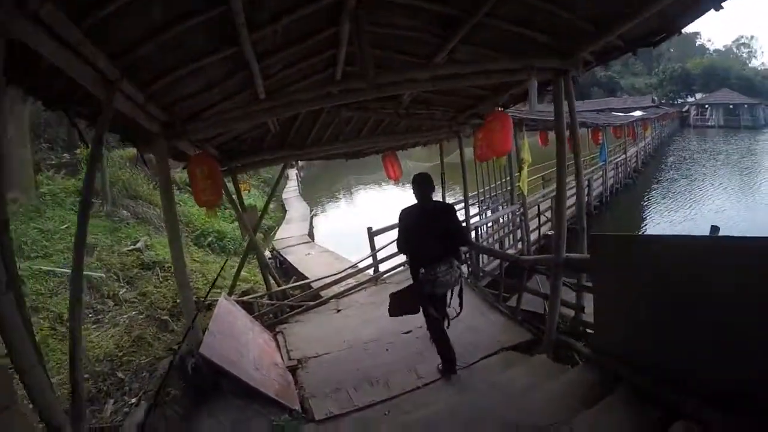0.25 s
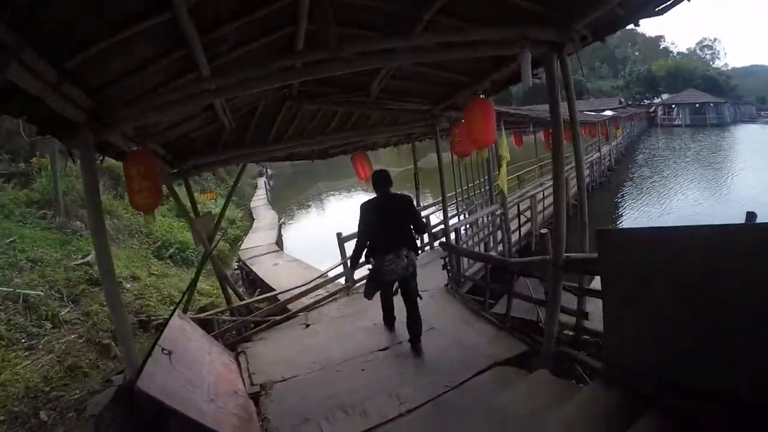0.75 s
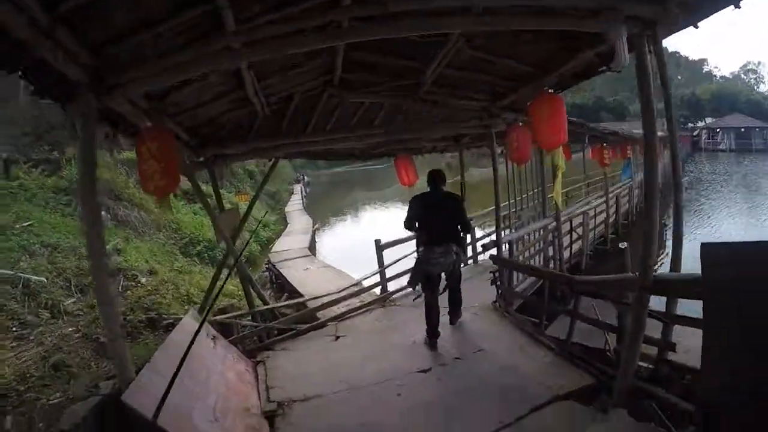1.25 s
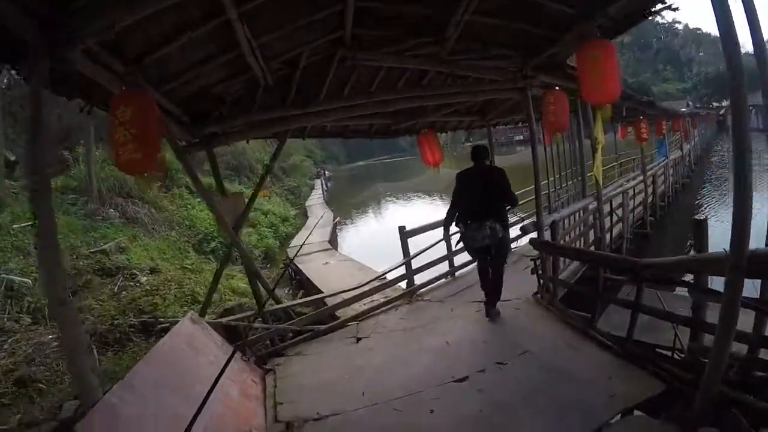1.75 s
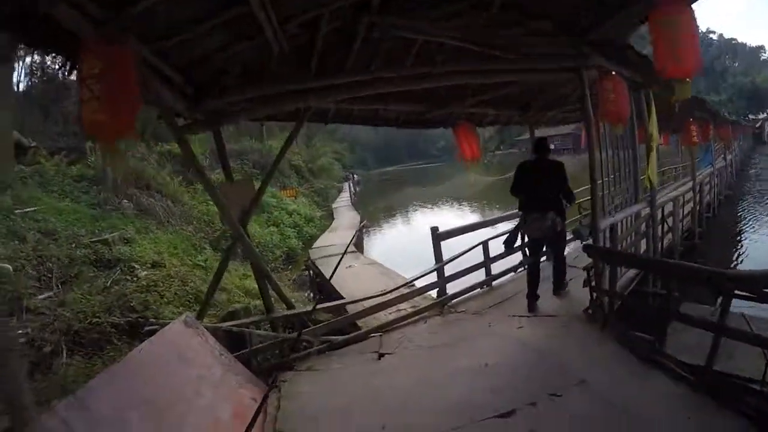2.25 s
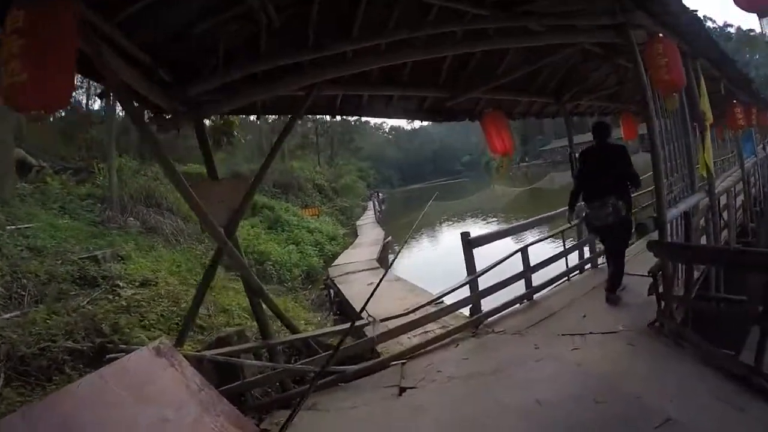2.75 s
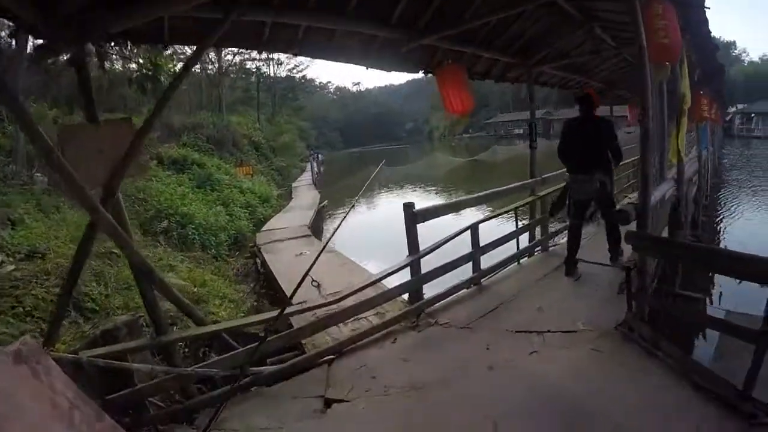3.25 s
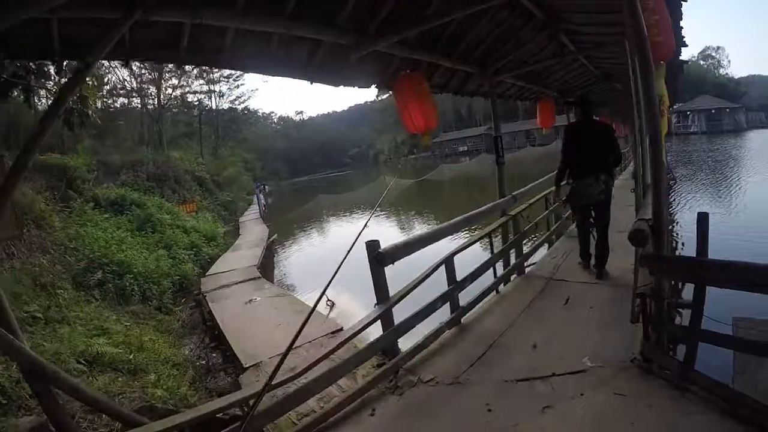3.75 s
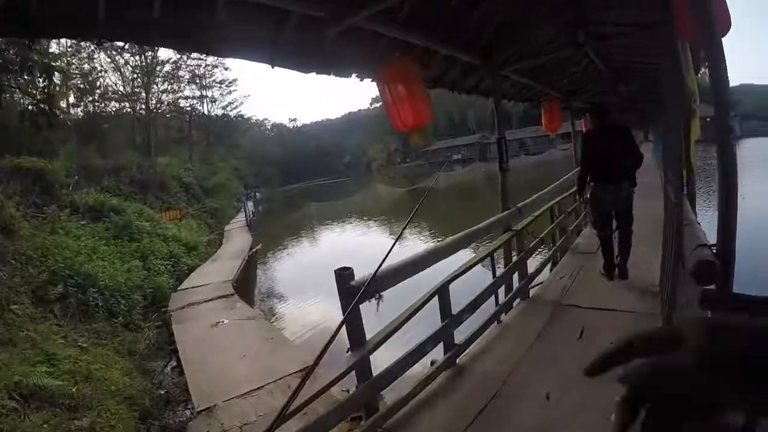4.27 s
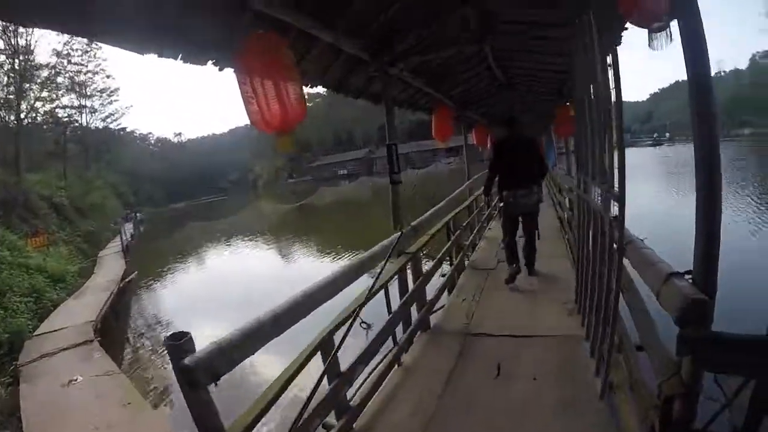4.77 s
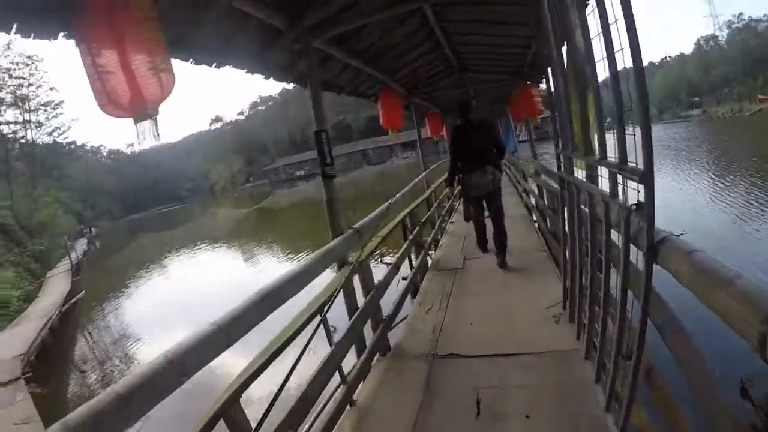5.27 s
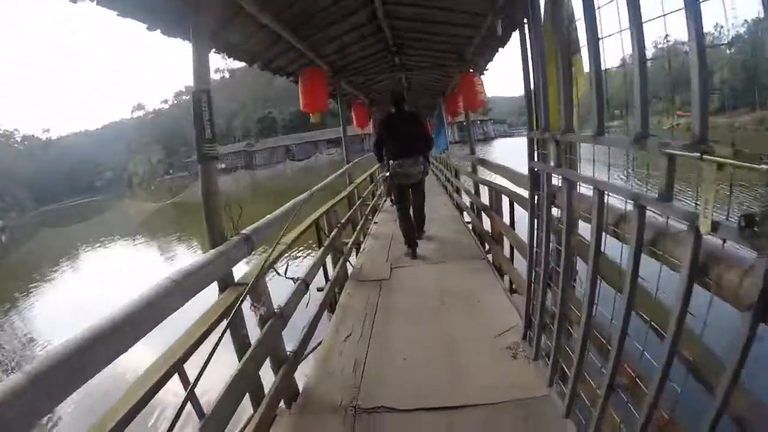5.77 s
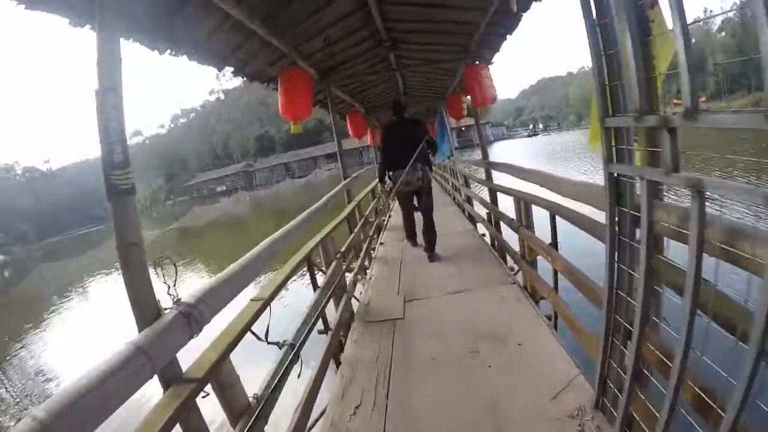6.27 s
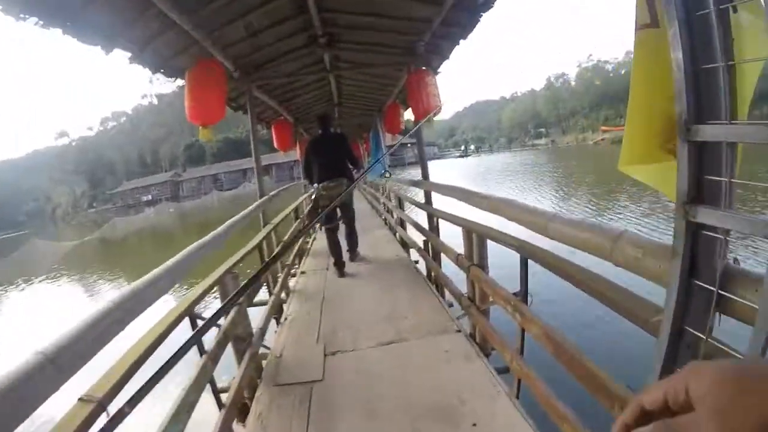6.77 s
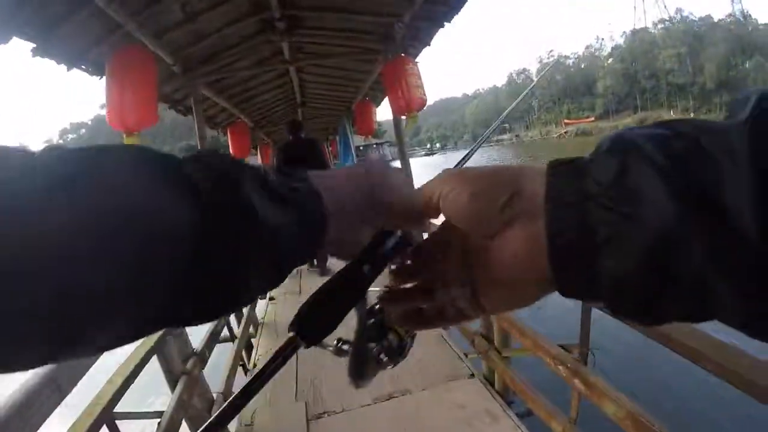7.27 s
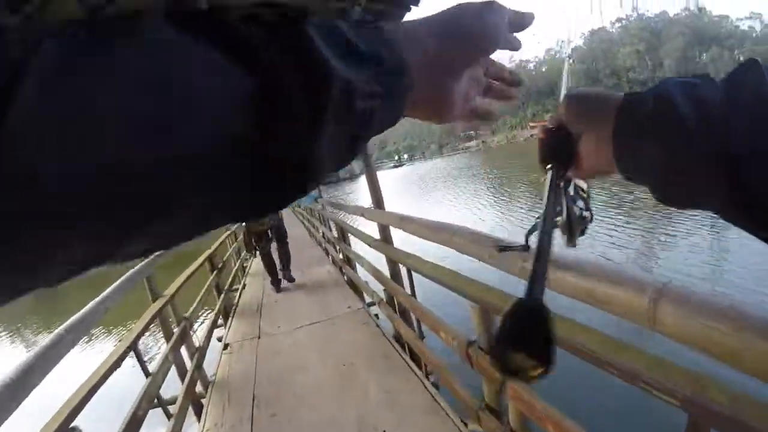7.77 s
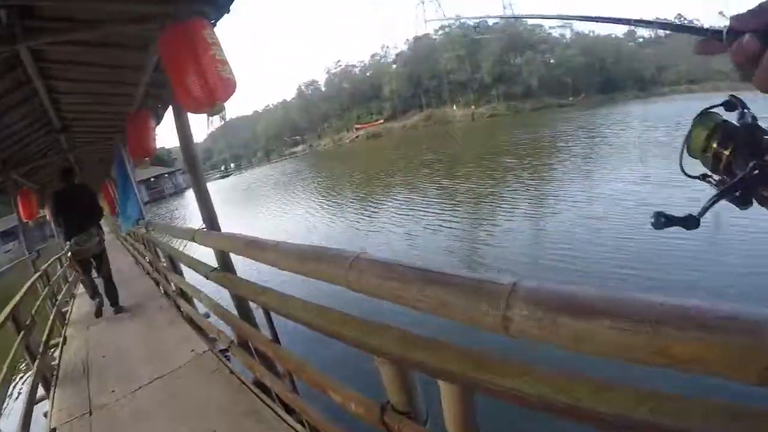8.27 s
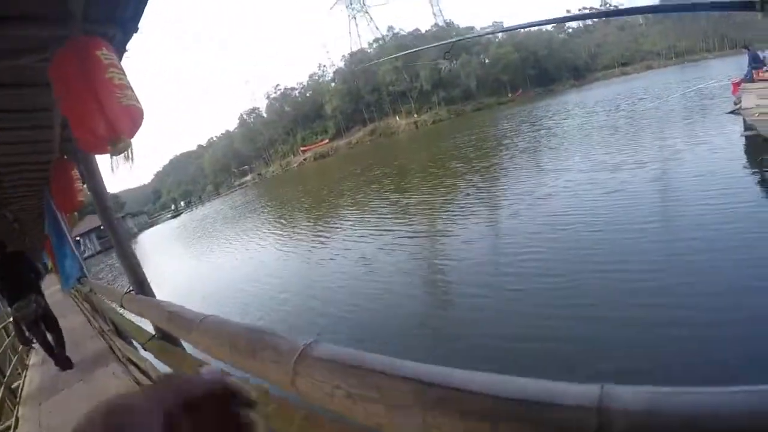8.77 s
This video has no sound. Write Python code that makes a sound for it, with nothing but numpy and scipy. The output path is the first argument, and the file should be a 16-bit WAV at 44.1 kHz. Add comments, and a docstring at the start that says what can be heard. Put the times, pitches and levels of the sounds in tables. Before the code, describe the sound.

Close, muffled body-worn microphone outdoors over water: low footstep jolts thud on hollow planks while a nylon jacket rustles and swishes and tackle ticks irregularly. Tiny metal tinkles and sleeve scrapes come and go. Steps soften after seven seconds; the reel squeaks faintly near eight, clicks open, then snaps shut hard at the end, with a faint distant bird. Soft air hiss throughout.

```python
"""A walker on a plank walkway, small camera strapped to the chest; air hiss and thin whine throughout.
From the start: jolts as damped swings, strap sway, cloth rustle and stirs, tackle ticks as slips and
bursts of noise through housing cavities; from 0.6 s loose metal tinkles as decaying sines. From 1.3 s
sleeve scrapes; at 3.3 s an insect buzz of throbbing noise bands; near 8 s reel squeaks of resonant noise,
then two reel snaps of decaying sines; from 8.6 s a far bird in short whistles."""
import sys
import numpy as np
from scipy import signal
from scipy.fft import rfft, irfft
from scipy.io import wavfile
from scipy.ndimage import uniform_filter1d

SR = 44100
rng = np.random.default_rng(int(sys.argv[2]) if len(sys.argv) > 2 else 0)


def master_out(mix):
    """Clip the mix to full scale and print it as 16-bit PCM to the path in sys.argv[1]."""
    frames = np.transpose(np.atleast_2d(mix))
    ceiling = np.clip(frames, -1, 1)
    pcm = np.round(ceiling * 32767).astype(np.int16)
    wavfile.write(sys.argv[1], SR, pcm)


N = 398223


def undb(db):
    """dB to gain."""
    return 10 ** (np.asarray(db) / 20)


def level(x, db):
    """Scale to an rms level."""
    return x * undb(db) / np.sqrt(np.mean(x ** 2))


def curve(table):
    """Each column as a straight-line curve over time."""
    s, *columns = np.transpose(table)
    return [np.interp(np.arange(N) / SR, s, c) for c in columns]


def band(x, lo_hz, hi_hz, order=2):
    """Band-pass."""
    sos = signal.butter(order, [lo_hz, min(hi_hz, .45 * SR)], "bandpass", fs=SR, output="sos")
    return signal.sosfilt(sos, x)


def ring(x, hz, width_hz):
    """One resonance."""
    return signal.lfilter(*signal.iirpeak(hz, hz / width_hz, fs=SR), x)


def add(out, s, sound):
    """Mix a sound in at time s."""
    i = int(s * SR)
    out[i:i + len(sound)] += sound[:N - i]


def walk(rate_hz):
    """Random levels held 1 / rate_hz and slewed twice; spread near 1."""
    k = int(SR / rate_hz)
    steps = np.repeat(rng.standard_normal(N // k + 1), k)
    return 4 / 3 * uniform_filter1d(uniform_filter1d(steps, k), k)[:N]


def grains(per_s, spread_db):
    """Slips at random moments, mostly small, a few large."""
    when, sign, size = rng.random((3, N))
    slips = (when < per_s / SR) * np.sign(sign - .5)
    return slips * undb(-spread_db * np.log(1 - size))


# housing cavities in front of the microphone: f/Hz, width/Hz, relative level/dB
CAVITIES = [(1000, 180, -1.5), (1576, 376, -2.5), (2240, 271, 0), (2696, 194, 0.5), (3700, 400, -5.5),
            (4610, 213, -8.5), (4923, 290, -9), (5534, 264, -11.5), (6150, 1550, -16), (7160, 1530, -16.5),
            (10180, 1130, -18.5), (13000, 510, -55)]
HOLE_HZ, HOLE_WIDTH_HZ = 3183, 320  # side cavity, swallows this band


def housing(x):
    """Parallel cavity resonances; alternating signs keep the valleys between them open."""
    y = 0
    for k, (hz, width_hz, db) in enumerate(CAVITIES):
        y = y + (-1) ** k * undb(db) * ring(x, hz, width_hz)
    return y - 0.7 * ring(y, HOLE_HZ, HOLE_WIDTH_HZ)


# heel and toe jolts, gear knocks above 100 Hz: t/s, nominal level/dB, initial swing f/Hz
JOLTS = [(0.09, -29, 71), (0.205, -23.5, 44.3), (0.265, -18.5, 31), (0.267, -29, 140), (0.318, -25.5, 30.5),
         (0.645, -30.5, 130), (0.741, -18.5, 31.6), (0.801, -18.5, 31.3), (0.829, -25.5, 150),
         (1.276, -12, 54), (1.337, -18, 43.6), (1.3631, -10.5, 45.6), (1.375, -25, 95), (1.385, -19.5, 115),
         (1.4, -23, 26.2), (1.753, -27, 29), (1.886, -16, 166), (1.896, -24, 28), (2.291, -20, 46.4),
         (2.3648, -11.5, 40.6), (2.4014, -21, 146), (2.405, -22, 33), (2.428, -26.5, 150),
         (2.78, -24, 29.5), (2.793, -19.5, 49), (2.875, -10, 37.7), (2.89, -19.5, 70), (2.907, -16, 176),
         (2.915, -20.5, 33.8), (3.22, -23, 71.6), (3.277, -30, 34.2), (3.321, -17.5, 153),
         (3.385, -18.5, 35.3), (3.437, -19.5, 32), (3.863, -36, 30), (3.939, -26, 40.7), (3.973, -16, 38.6),
         (4.029, -20, 36.7), (4.065, -19, 176), (4.105, -22.5, 30), (4.56, -23.5, 40.3), (4.612, -23, 38),
         (4.619, -21, 162), (4.676, -26, 29.5), (4.744, -24.5, 150), (4.779, -27, 50), (5.142, -11, 34.6),
         (5.178, -24, 28), (5.2, -12.5, 39), (5.242, -13.5, 162), (5.277, -24.5, 92.0), (5.306, -17.5, 37),
         (5.565, -28, 51.3), (5.794, -31, 35), (5.832, -16, 38.7), (6.105, -28, 131.6), (6.15, -23.5, 28.6),
         (6.314, -18.5, 39), (6.364, -16.5, 37.6), (6.373, -27, 120), (6.51, -21, 173),
         (6.709, -29.5, 44.3), (6.911, -15, 43), (6.969, -19.5, 164), (6.977, -20, 27.8),
         (7.475, -24, 78.5), (7.531, -26, 39), (7.634, -25, 28.8), (8.065, -18.5, 37), (8.137, -18.5, 27.6),
         (8.393, -34.5, 45.7), (8.55, -32.5, 44.8), (8.873, -28.5, 82)]
# hollow plank ring after hard knocks: f/Hz, width/Hz, relative level/dB
PLANK_MODES = [(150, 9, -4), (447, 250, -13.5)]


def jolts():
    """One push and rebound each: a heavily damped swing that slows as flesh and strap give way."""
    thuds, knocks = np.zeros(N), np.zeros(N)
    for s, db, hz in JOLTS:
        turns = np.arange(int(2 * SR / hz)) * hz / SR
        swing = np.sin(2 * np.pi * turns * np.exp(-.15 * turns))
        swing = swing * np.exp(-.9 * turns) * (1 - np.exp(-25 * turns))
        add(thuds, s, undb(db) * swing * np.cos(np.pi * turns / 4) / swing.max())
        # quicker push: harder contact, more wood ring
        add(knocks, s, undb(db) * (hz / 150) ** 2.3 * np.hanning(int(0.0022 * SR)))
    soft = signal.sosfilt(signal.butter(2, 420, fs=SR, output="sos"), thuds)  # padding dulls the edge
    return soft + sum(undb(db) * ring(knocks, hz, width_hz) for hz, width_hz, db in PLANK_MODES)


# strap shifting on the chest: t/s, deep sway level/dB, quick bump level/dB
STRAP = [(0, -42, -54), (.45, -47.5, -49), (.85, -35, -53), (1.12, -48, -60), (1.6, -41.5, -59.5),
         (1.86, -34, -56), (2.17, -46, -58), (2.7, -37, -54), (3.3, -40.5, -53), (5, -43, -55.5),
         (5.8, -34, -47), (6.1, -37, -47), (6.7, -42.5, -59), (6.95, -32.5, -55), (7.25, -41.5, -54),
         (8, -45.5, -54.5), (8.55, -42.5, -55), (8.73, -45, -49), (9.03, -44.5, -59.5)]
SHAKE_HALF_S, SHAKE_LEAD = 0.087, 0.98  # lead: share of the half length before the jolt
SHAKE_DEEP_DB, SHAKE_QUICK_DB = -25, -34.5  # re each jolt
RUB_REST_DB, RUB_RE_CLOTH_DB = -64, -13


def strap():
    """Many small random bumps: a deep sway, quicker bumps and a dull rub."""
    deep_db, quick_db = curve(STRAP)
    shake = np.zeros(N)
    for s, db, _ in JOLTS:
        start_s = max(s - SHAKE_LEAD * SHAKE_HALF_S, 0)
        add(shake, start_s, undb(db) * np.hanning(int(2 * SHAKE_HALF_S * SR)))
    deep_gain = np.hypot(undb(deep_db), undb(SHAKE_DEEP_DB) * shake)
    quick_gain = np.hypot(undb(quick_db), undb(SHAKE_QUICK_DB) * shake)
    cloth_gain = uniform_filter1d(cloth()[0], size=SR // 10)
    rub_gain = np.hypot(undb(RUB_REST_DB), undb(RUB_RE_CLOTH_DB) * cloth_gain)

    deep = level(band(band(grains(200, 1.63), 15.3, 28.3, order=1), 8.4, 103), 0)
    quick = level(band(grains(400, 1.95), 86.7, 173.7), 0)
    rub = level(band(grains(1200, 2.15), 234, 636), 0)
    sway = deep_gain * undb(2.46 * walk(13)) * deep
    bumps = quick_gain * undb(4.15 * walk(30)) * quick
    return sway + bumps + rub_gain * undb(3.9 * walk(25)) * rub


# rustle bed, rising and falling with movement: t/s, nominal level/dB, treble re level/dB
RUSTLE = [(0, -54, -9), (.16, -55, -17), (.6, -49, -10.5), (1.04, -71, -10), (1.68, -59.5, -18),
          (2.12, -61.5, -11), (2.6, -53.5, -10), (2.92, -47, -14), (3.12, -60, -15), (4.1, -59, -20),
          (4.42, -58.5, -0.5), (4.7, -59, -14), (5.3, -48, -17), (5.85, -63, -12), (6.35, -58, -18),
          (6.82, -60.5, -2.5), (7.21, -57, -7.5), (7.46, -47, -15), (7.64, -61, -7), (8, -57.5, -3),
          (8.5, -68, -19), (8.9, -57, -20), (9.03, -57.5, -6)]
# swishes, and brief cloth stirs set off by a tick:
# peak t/s, nominal level/dB, swell/s, fade/s (each spans STIR_SPAN_DB)
CLOTH_STIRS = [(.045, -44.5, 0.012, 0.042), (.73, -48, 0.072, 0.23), (.95, -47, 0.07, 0.066),
               (1.27, -39.5, 0.09, .05), (1.33, -37.5, 0.066, 0.015), (1.39, -43, 0.084, 0.14),
               (1.82, -48.5, 0.12, .05), (1.89, -40.5, 0.025, 0.036), (1.95, -48, 0.084, 0.087),
               (2.1, -43.5, 0.054, 0.012), (2.49, -46.5, 0.5, 0.1), (2.83, -38, 0.054, 0.045),
               (2.87, -33, 0.035, 0.015), (3.05, -36.5, 0.068, 0.044), (3.09, -33.5, 0.1, 0.015),
               (3.22, -43, 0.12, 0.059), (3.321, -43.5, 0.0081, 0.031), (3.429, -39, 0.067, 0.032),
               (3.63, -44, 0.096, 0.22), (3.93, -42, 0.075, 0.073), (4.07, -51.5, 0.051, .05),
               (4.18, -50.5, 0.026, 0.9), (4.63, -39.5, 0.064, 0.027), (4.78, -40, 0.031, 0.1),
               (4.97, -47.5, 0.11, 0.096), (5.135, -45.5, 0.013, .08), (5.405, -35.5, 0.059, 0.044),
               (5.63, -45, 0.13, 0.069), (5.75, -44, 0.11, 0.12), (5.958, -31, 0.1, 0.095),
               (6.09, -38, 0.08, 0.054), (6.22, -47.5, .08, 0.22), (6.4, -43.5, 0.032, 0.069),
               (6.52, -47.5, 0.042, .07), (6.59, -38.5, 0.06, 0.021), (6.98, -42.5, 0.12, 0.06),
               (7.17, -46, 0.12, 0.036), (7.603, -41.5, 0.11, .02), (7.694, -47.5, 0.061, .07),
               (7.94, -58, 0.016, .09), (8.034, -44.5, 0.008, 0.3), (8.33, -49, 0.09, 0.019),
               (8.404, -46, .04, .05), (8.526, -48, 0.044, 0.084), (8.8, -48, 0.25, .1),
               (8.844, -44, 0.14, 0.017)]
STIR_SPAN_DB, STIR_TREBLE_DB = 15, -14.5


def cloth():
    """Gains of the cloth's body and treble: rustle bed plus swishes and stirs, linear in dB up and down."""
    db, treble_db = curve(RUSTLE)
    t, power = np.arange(0, N, 32) / SR, 0
    for s, peak_db, swell_s, fade_s in CLOTH_STIRS:
        away = np.where(t < s, (s - t) / swell_s, (t - s) / fade_s)
        power = power + undb(peak_db - STIR_SPAN_DB * away) ** 2
    power = np.interp(np.arange(N) / SR, t, power)
    gain = np.sqrt(undb(db) ** 2 + power)
    treble_gain = np.sqrt(undb(db + treble_db) ** 2 + undb(STIR_TREBLE_DB) ** 2 * power)
    return gain, treble_gain


def jacket():
    """Dense nylon thread slips and sparse creases ring the housing; cloth sticks and slides in jerks."""
    gain, treble_gain = cloth()
    crease = signal.lfilter([1], [1, -.985], np.abs(grains(70, 1.6)))  # each snap decays over 1.5 ms
    threads = level(grains(6000, 1.57), 0) + 0.64 * rng.standard_normal(N)
    body = housing((1 + 1.44 * crease) * threads)
    low = undb(1.9 * walk(50)) * level(band(body, 645, 1880), -2.0)
    sheen = level(band(body, 2480, 6200), -5.0)
    treble = level(band(body, 4160, 12200), -0.44)
    return undb(0.89 * walk(45)) * (gain * (low + sheen) + treble_gain * treble)


# sleeve scrapes: start t/s, end t/s, level before ramps/dB, centre f/Hz
SCRAPES = [(1.308, 1.34, -39, 3000), (2.062, 2.106, -53, 3500), (2.812, 2.873, -30.5, 3050),
           (3, 3.11, -45.5, 2440), (4.612, 4.648, -46.5, 3000), (5.704, 5.784, -43.5, 3500),
           (5.885, 6.03, -56, 2470), (6.559, 6.595, -45.5, 2500), (7.55, 7.622, -53, 3000),
           (8.72, 8.83, -51, 1980)]
# reel squeaks: start t/s, end t/s, f/Hz, level before window/dB
SQUEAKS = [(7.922, 7.969, 3450, -49), (7.926, 7.96, 5100, -57), (8.166, 8.215, 2950, -56)]


def scrapes():
    """A sleeve drags on the jacket: thread slips swell, then stop faster; reel squeaks ring one mode."""
    out = np.zeros(N)
    threads = housing(level(grains(9000, 1.5), 0)) * undb(3.0 * walk(70))
    for start, end, db, hz in SCRAPES:
        part = band(threads[int(start * SR):int(end * SR)], hz / 2.2, hz * 3.7, order=1)
        u = np.linspace(0, 1, len(part))
        add(out, start, level(part, db) * np.minimum(u / .3, 1) * np.minimum((1 - u) / .12, 1))
    for start, end, hz, db in SQUEAKS:
        part = ring(rng.standard_normal(int((end - start) * SR)), hz, 120)
        add(out, start, level(part, db) * np.hanning(len(part)))
    return out


# buckles and tackle: t/s, peak level/dB, centre f/Hz, treble re level/dB, wooden body re level/dB
TICKS = [(0.02, -35, 2730, -14, -27), (0.035, -30.5, 980, -10, -18), (0.083, -30.5, 1060, -25, -4.5),
         (0.119, -27.5, 1960, -30.5, -17), (0.352, -35.5, 969, -37, -27), (0.726, -29.5, 1470, -14, -18),
         (0.826, -36.5, 1440, -22.5, -9.5), (0.958, -37, 3940, -27, -26), (1.269, -28.5, 1000, -27, -14),
         (1.37, -28.5, 993, -27, -4), (1.618, -42, 900, -21, -4), (1.848, -25.5, 2320, -3.5, -20),
         (1.885, -28, 1670, -29, -4), (1.95, -32, 2660, -27.5, -27), (2.054, -38, 1020, -18, -16),
         (2.257, -38.5, 1510, -11, -3), (2.395, -34.5, 1470, -23, -6.5), (2.429, -31, 1000, -28, -25.5),
         (2.482, -33.5, 1060, -10, -6), (2.706, -31.5, 3990, -22, -10), (2.74, -37, 1080, -33, -10),
         (2.904, -32, 2180, -28, -3), (3.017, -34.5, 2600, 4, -23), (3.202, -33, 1410, -25, -17),
         (3.317, -30, 964, -26, -7), (3.79, -39, 1390, -30.5, -27), (3.897, -37, 1000, -33.5, -12),
         (4.063, -35.5, 980, -21.5, -4), (4.175, -36, 1000, -25, -9), (4.214, -37, 1440, -10, -18),
         (4.508, -36, 945, -17, -6), (4.615, -26.5, 1460, -27.5, -13), (4.951, -36, 2230, -24, -10),
         (4.97, -30.5, 3630, -29.5, -9.5), (5.12, -21, 1030, -31, -17.5), (5.205, -32, 703, -7, -15),
         (5.238, -23, 1000, -28, -14), (5.267, -33, 1030, -30, -4), (5.299, -36, 982, -28, -19),
         (5.603, -34, 1130, -30, -14), (5.76, -28, 1450, -6, -22), (5.847, -27.5, 3540, -5, -22),
         (5.86, -23, 1060, -6.5, -25), (5.882, -32, 1450, -10, -6), (5.999, -26, 1100, -30.5, -24.5),
         (6.287, -29.5, 3700, -30, -30), (6.394, -31, 1020, -1, -15), (6.448, -31, 920, -4, -24),
         (6.509, -29.5, 1050, -29, -6), (6.882, -30, 2680, -12, -21), (6.967, -26.5, 1000, -44, -22),
         (7.064, -33.5, 930, -11, -21), (7.365, -29.5, 1000, -18, -9), (7.476, -21, 940, -18, -14.5),
         (7.497, -20, 1220, -14, -14.5), (7.513, -36, 2240, -30, -22), (7.587, -29, 1010, -20.5, -9),
         (7.749, -34, 2750, -8, -16), (7.892, -43, 1010, -22, -6), (8.028, -39, 877, -17, -1.5),
         (8.276, -21.5, 1540, -4, -30), (8.522, -35.5, 985, -28.5, -6), (8.869, -14, 1580, -6.5, -29)]
TICK_FADE_S, WOOD_FADE_S = 0.0024, 0.0069
# faint ticks at random moments
FAINT_PER_S, FAINT_DB, FAINT_SPREAD_DB, FAINT_TREBLE_DB, FAINT_WOOD_DB = 2, -40.5, 4.5, -18, -19


def ticks():
    """A few ms of crackle around each tick's pitch, with a bright edge and a short hollow body."""
    out, t = np.zeros(N), np.arange(int(.04 * SR)) / SR
    events = list(TICKS)
    for when, loud, pitch in rng.random((int(FAINT_PER_S * N / SR), 3)):
        db = FAINT_DB + FAINT_SPREAD_DB * (2 * loud - 1)
        events.append((when * N / SR, db, 900 * 2.8 ** pitch ** 2, FAINT_TREBLE_DB, FAINT_WOOD_DB))
    for s, db, hz, treble_db, wood_db in events:
        crackle = rng.standard_normal(len(t))
        burst = (crackle + 7.9 * (t == 0)) * np.exp(-t / TICK_FADE_S)  # first contact is hardest
        pitched = housing(band(burst, hz / 1.04, hz * 1.85, order=1) + 2.2 * ring(burst, hz, hz / 5))
        edge = housing(band(burst, 1550, 20000))
        wood = band(crackle * np.exp(-t / WOOD_FADE_S), 247, 616)
        for part, part_db in ((pitched, 0), (edge, treble_db), (wood, wood_db)):
            add(out, s, undb(db + part_db) * part / np.abs(part).max())
    return out


# small metal part swinging: t/s, upper ring nominal level/dB, lower ring nominal level/dB
TINKLES = [(0.5975, -64, -75), (1.2196, -64, -68), (1.3937, -72.5, -76), (2.0482, -63, -60),
           (2.2189, -62, -67), (3.2186, -60, -74), (3.3024, -59, -73), (5.6111, -62, -75),
           (5.818, -59, -52), (6.543, -60, -68), (6.982, -60.5, -64), (8.2312, -66, -77)]
# its rings, upper then lower: f/Hz, t60/s
TINKLE_MODES = [(12680, 0.125), (10500, 0.18)]
# reel's metal arm snaps open, then shut: t/s, level/dB, share of longest mode t60 left free
REEL_SNAPS = [(8.277, -8, 0.11), (8.8695, -0.5, 0.81)]
# reel arm: f/Hz, relative level/dB, free t60/s
REEL_MODES = [(1026, -34.5, .03), (1560, -39, .02), (1860, -41, 0.37), (2750, -20.5, 0.021),
              (3700, -31, 0.021), (4860, -50, .013), (5430, -49, 0.017), (6850, -57, .015),
              (10000, -42, .012)]


def metal():
    """Thin decaying rings of small metal parts; the loose one wavers as it swings."""
    loose, reel, t = np.zeros(N), np.zeros(N), np.arange(int(.3 * SR)) / SR
    for s, *levels_db in TINKLES:
        for (hz, t60), db in zip(TINKLE_MODES, levels_db):
            fade = undb(db - 60 * t / t60) * (1 - np.exp(-t / 0.0042))
            add(loose, s, fade * np.sin(2 * np.pi * hz * t))
    longest_s = max(t60 for _, _, t60 in REEL_MODES)
    for s, snap_db, free in REEL_SNAPS:
        for hz, db, t60 in REEL_MODES:
            held_s = min(t60, free * longest_s)  # a finger on the arm stops the long ring
            add(reel, s, undb(snap_db + db - 60 * t / held_s) * np.sin(2 * np.pi * hz * t))
    return loose * undb(4.5 * walk(80)) + reel


# far bird: start t/s, end t/s, initial f/Hz, nominal level/dB
CHIRPS = [(8.62, 8.65, 7300, -67), (8.885, 8.91, 7050, -74), (8.92, 8.965, 7080, -66),
          (8.97, 8.995, 7000, -66)]


def bird():
    """Short thin whistles that sag a little."""
    out = np.zeros(N)
    for start, end, hz, db in CHIRPS:
        t = np.arange(int((end - start) * SR)) / SR
        add(out, start, undb(db) * np.hanning(len(t)) * np.sin(2 * np.pi * hz * t * (1 - .1 * t)))
    return out * undb(2.7 * walk(120))


# open air over water, spectrum: f/Hz, relative level/dB per Hz
AIR_SPECTRUM = [(120, -38), (200, -31.5), (777, -18), (1000, 0), (2250, 0), (3190, -9), (4950, -13.5),
                (5840, -8.5), (14100, -19.5), (16000, -32)]
AIR_DB, MIC_HISS_DB = -64, -79.5
WHINE_HZ, WHINE_DB = 13930, -88
# one buzz: start t/s, end t/s, throbs per s, bands of (f/Hz, level before throb/dB)
INSECT = (3.3, 3.51, 55, [(6050, -76), (12050, -73)])


def narrow_noise(hz, db):
    """Noise 240 Hz wide at an rms level."""
    return level(band(rng.standard_normal(N), hz - 120, hz + 120), db)


def air():
    """Shaped-noise hiss, a thin high whine and an insect buzz as throbbing narrow noise."""
    f = np.arange(N // 2 + 1) * SR / N + 1
    hz, db = np.transpose(AIR_SPECTRUM)
    shape = undb(np.interp(np.log(f), np.log(hz), db))
    hiss = level(irfft(rfft(rng.standard_normal(N)) * shape, N), AIR_DB) * undb(.8 * walk(3))
    mic = level(band(rng.standard_normal(N), 5000, 16000, order=1), MIC_HISS_DB)
    start, end, throbs_per_s, bands = INSECT
    t = np.arange(N) / SR
    throb = (t > start) * (t < end) * np.cos(np.pi * throbs_per_s * t) ** 2
    buzz = sum(narrow_noise(hz, db) for hz, db in bands)
    return hiss + mic + narrow_noise(WHINE_HZ, WHINE_DB) + throb * buzz


def scene():
    """Everything reaches one microphone."""
    return (jolts() + strap() + jacket() + scrapes() + ticks() + metal() + bird() + air())[None]


DROOP_HZ, TOP_HZ = 15450, 16300


def record(dry):
    """The camera drops the deepest bass, droops at the very top and cuts above it."""
    dry = signal.sosfilt(signal.butter(1, 9, "highpass", fs=SR, output="sos"), dry)
    dry = signal.sosfilt(signal.ellip(5, .2, 22, DROOP_HZ, fs=SR, output="sos"), dry)
    return signal.sosfilt(signal.ellip(10, .2, 60, TOP_HZ, fs=SR, output="sos"), dry)


dry = scene()
out = record(dry)
master_out(out)
```